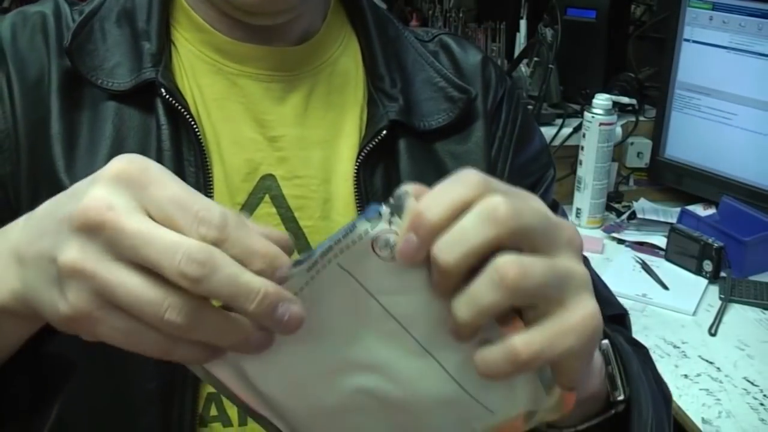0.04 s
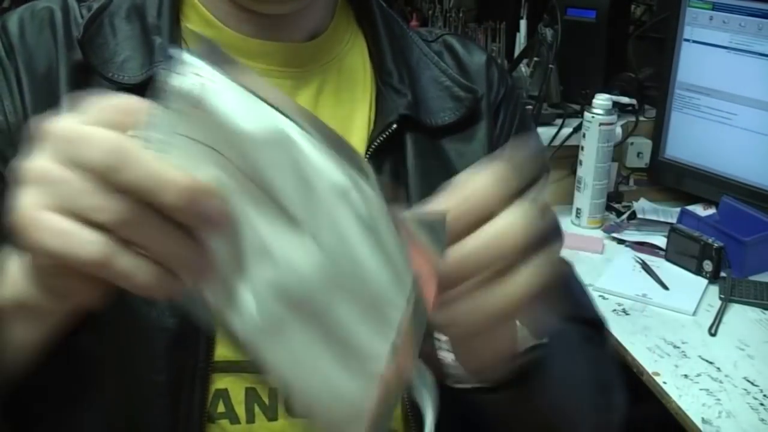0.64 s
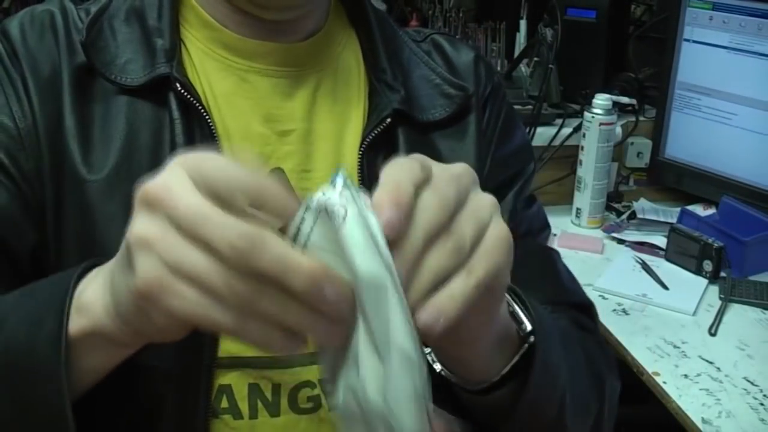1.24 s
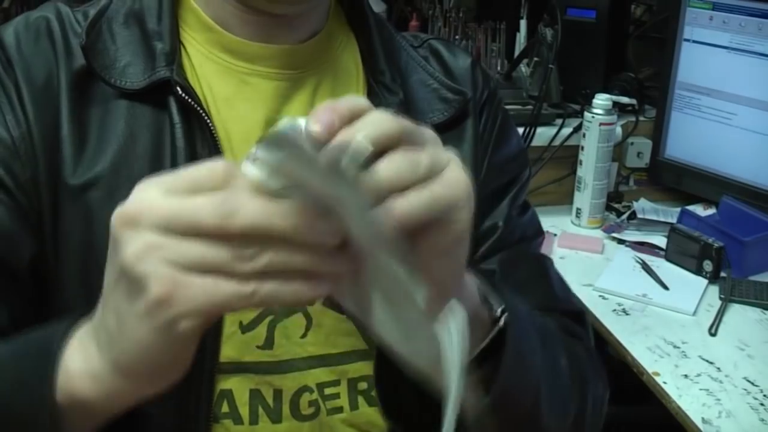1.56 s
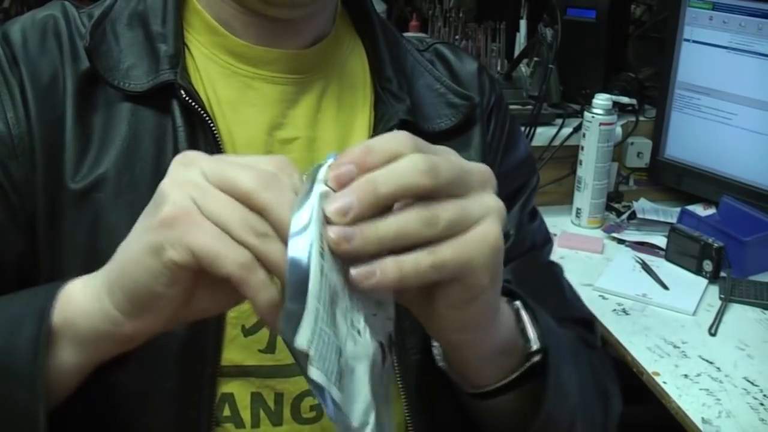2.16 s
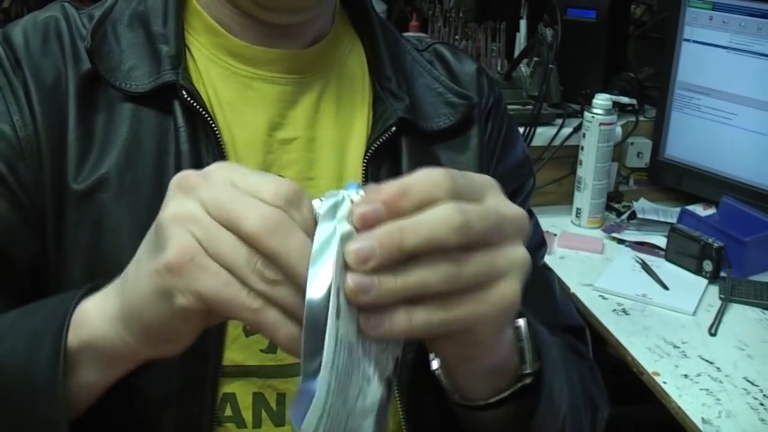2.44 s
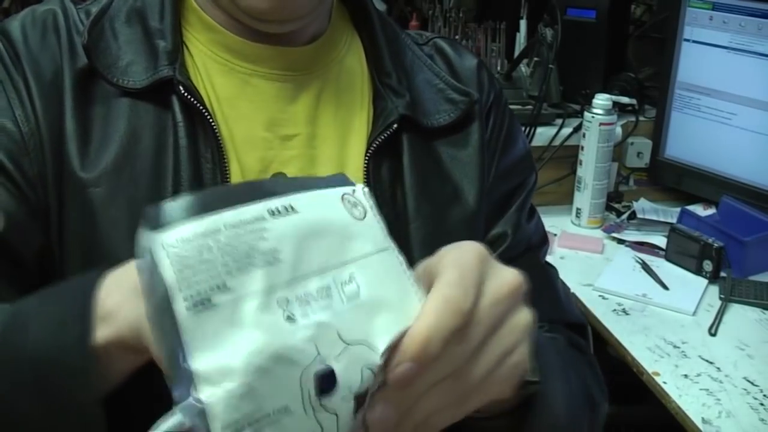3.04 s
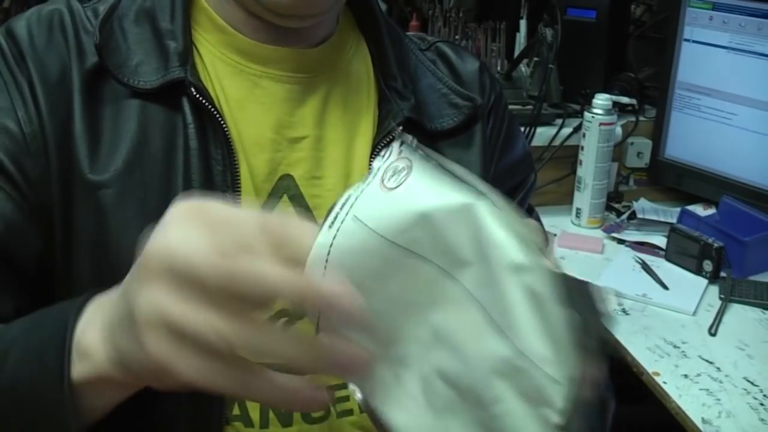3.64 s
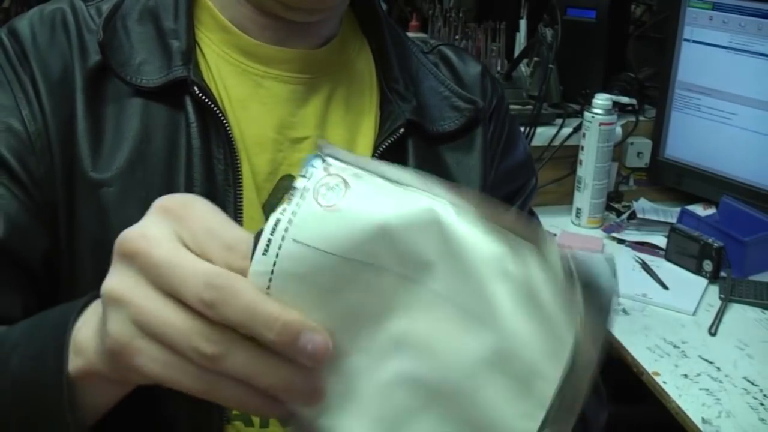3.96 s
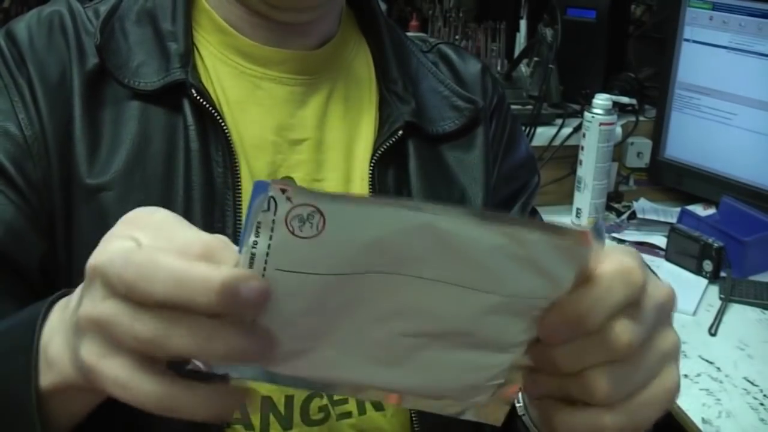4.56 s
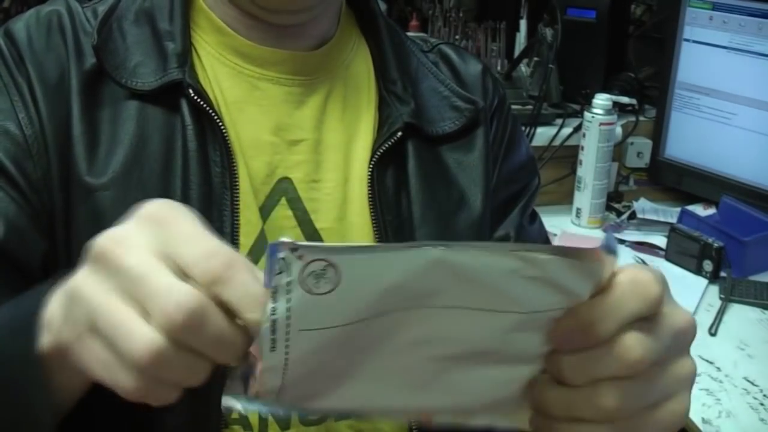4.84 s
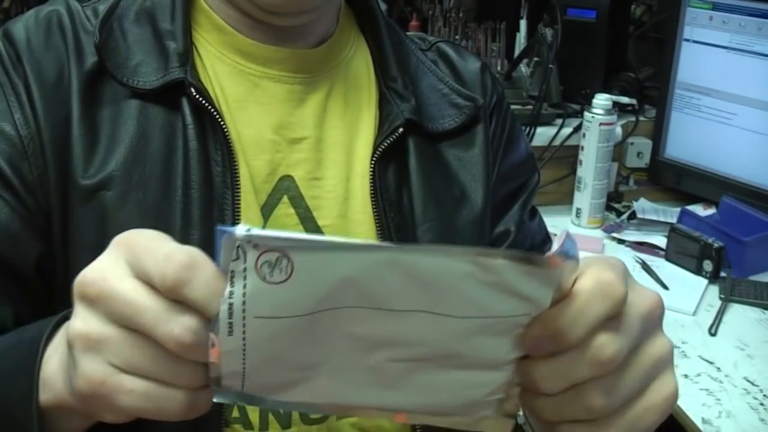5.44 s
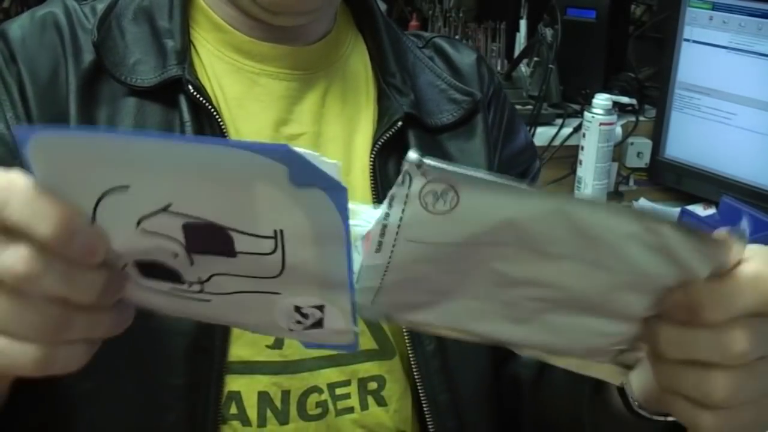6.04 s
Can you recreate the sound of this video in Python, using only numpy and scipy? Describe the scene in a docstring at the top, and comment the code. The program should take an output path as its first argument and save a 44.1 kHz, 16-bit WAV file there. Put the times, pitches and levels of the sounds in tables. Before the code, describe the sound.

A foil and plastic packet crinkles, snaps and rustles irregularly as it is turned and opened, over a soft equipment hum.

```python
"""Sharp crackles and soft rustling: two hands turn, bend and pull open a plastic-and-foil pouch.
Single creases snap, whole patches buckle in bursts of tiny clicks, and the pouch wall pops hollowly.
Fingers slide over the film and squeak faintly. A small metal piece, like a watch strap, tinkles
as the hands jerk. It all happens close by in a small room, where equipment hums softly."""
import sys
import numpy as np
from scipy import signal
from scipy.fft import rfft, irfft
from scipy.io import wavfile
from scipy.ndimage import uniform_filter1d

SR = 44100
rng = np.random.default_rng(int(sys.argv[2]) if len(sys.argv) > 2 else 0)


def digitize_waveform(pressure):
    """Quantize a signal to 16-bit integers and store it at the path in sys.argv[1].

    Rows of a 2-D input are taken as channels; values are limited to [-1, 1].
    """
    field = np.atleast_2d(pressure).T
    bounded = np.clip(field, -1, 1)
    quanta = np.round(bounded * 32767).astype(np.int16)
    wavfile.write(sys.argv[1], SR, quanta)


N = 277563
CLICK_SAMPLES = 2048
CLICK_HZ = np.fft.rfftfreq(CLICK_SAMPLES, 1 / SR)

# Levels in the tables are relative: the functions turn them up or down.
# one crease flips: start_s, level_db, pitch_hz, treble_fall_db_per_octave
CREASE_SNAPS = [(0.018,-30.5,1870,3.5), (0.0335,-31,2200,4), (0.4268,-29.5,1300,5.5), (.671,-27.5,1620,4),
                (0.7291,-29.5,7000,5), (0.808,-29.5,1400,10.5), (0.818,-27,2540,16), (0.846,-25,4500,8.5),
                (0.898,-28,1790,1), (1.354,-18,3170,9.5), (1.4019,-28,2350,8), (1.5024,-18.5,2410,29),
                (1.5563,-19.5,2730,12), (1.5857,-21,2170,11.5), (1.6059,-24.5,2060,15.5),
                (1.8183,-22,3040,15.5), (1.839,-23,3200,-24), (2.1693,-28,1840,31), (2.4006,-30.5,1260,20),
                (2.583,-24,3250,14), (2.653,-34.5,1590,11), (2.7656,-29,1300,5.5), (2.885,-35.5,1390,7),
                (3.002,-36.5,2580,14), (3.0676,-28.5,2130,8), (3.094,-20,2720,12), (3.174,-21.5,2830,15),
                (3.224,-14,2630,14.5), (3.2737,-17.5,2450,17.5), (3.438,-23,2650,19),
                (3.4783,-17.5,2160,10), (3.823,-36,1200,7.5), (3.8727,-29,2040,-2.5), (3.9955,-28,3600,5),
                (4.079,-34,2450,21), (4.2351,-21.5,1250,2), (4.24,-20.5,1040,5), (4.359,-33,3000,3),
                (4.3738,-25,1770,6), (4.394,-30,2040,10), (4.489,-31.5,1840,11), (4.6572,-34.5,1830,4),
                (4.6735,-30,5000,-1), (4.7307,-36,5000,21), (4.853,-22.5,2370,3.5), (4.977,-24,2600,25),
                (4.999,-28,1900,3), (5.0262,-29.5,4060,10), (5.415,-30,1430,6.5), (5.6909,-27.5,1520,5.5),
                (5.794,-38,3000,16), (5.8781,-20.5,4350,15), (5.9615,-25,2390,29), (6.059,-42.5,9000,-3)]
# a patch buckles: start_s, level_db, length_s, pitch_hz, treble_fall_db_per_octave
BUCKLES = [(0.031,-38.5,0.012,1900,4), (0.439,-38,0.034,1870,5), (0.556,-37.5,0.0049,1910,5),
           (0.812,-34.5,0.014,2260,9.5), (0.9232,-29.5,0.0091,2930,10.5), (0.94,-42.5,0.053,110,5.5),
           (1.043,-33.5,0.0096,2920,8), (1.2,-38,0.018,2000,3.5), (1.216,-28,0.0074,2340,11.5),
           (1.285,-43.5,0.038,1690,14), (1.339,-34,0.02,2100,7), (1.504,-27,0.0053,980,7),
           (1.833,-29,0.011,5030,9), (1.924,-40.5,0.013,2600,10), (2.169,-24.5,0.0048,1830,12.5),
           (2.182,-36,0.047,1750,11.5), (2.343,-43,0.045,1390,22.5), (2.58,-33.5,0.0076,3500,7),
           (2.627,-43.5,0.038,1350,9), (2.688,-36.5,0.0073,940,8.5), (3.208,-31.5,0.012,1730,6.5),
           (3.23,-31,0.032,2180,9), (3.477,-30,0.028,1240,9), (3.504,-36,0.051,1030,5),
           (3.605,-39.5,0.0074,530,16), (3.696,-36,0.037,2850,8), (3.735,-33.5,0.031,3400,11.5),
           (3.756,-36.5,0.013,710,16.5), (3.993,-32.5,0.0088,810,10.5), (4.233,-29.5,0.015,1150,2.5),
           (4.363,-41,0.043,2240,5.5), (4.44,-39,0.028,490,4), (4.528,-38.5,0.018,970,7.5),
           (4.764,-38.5,0.051,1680,3), (4.976,-33.5,0.042,2700,-2), (5.531,-46,0.036,744,10),
           (5.87,-34.5,0.016,2500,5.5), (5.891,-26.5,0.013,2600,6), (5.909,-32,0.043,1810,4.5),
           (5.949,-33.5,0.024,2120,11)]
# a finger slides: start_s, length_s, level_db, brightness_db (crisp part over dull part)
FINGER_STROKES = [(0.171,0.18,-45.5,2.5), (0.37,0.15,-47.5,0), (0.66,0.14,-53,-2), (0.826,0.31,-45.5,7.5),
                  (1.239,0.091,-39.5,-8), (1.308,0.12,-45,5), (1.463,0.1,-42,11), (1.852,0.11,-48,0),
                  (2.449,0.019,-45,-38), (2.594,0.22,-48.5,-5.5), (2.856,0.045,-46.5,-2.5),
                  (2.94,0.098,-41.5,2), (3.181,0.041,-40.5,2), (4.007,0.12,-48.5,2), (4.146,0.15,-43.5,6.5),
                  (4.405,0.12,-44,4), (4.55,0.03,-38,10), (4.661,0.041,-51,24), (4.727,0.11,-46.5,13),
                  (4.907,0.16,-49,0), (5.061,0.048,-38.5,11.5), (5.098,0.15,-49,-4), (5.518,0.3,-58,23)]
# tone of the sliding film: frequency_hz, level_db
FILM_TONE = [(100, 3.5), (200, 0.5), (450, -0.5), (1000, 5), (2200, 4.5), (3500, -4), (7000, -10.5),
             (14000, -17)]
# the whole pouch flexes: start_s, level_db
WALL_POPS = [(1.202,-35), (1.835,-35), (2.17,-43.5), (3.995,-30), (4.236,-43.5), (5.945,-37)]
# its hollow ring: pitch_hz, level_db, ring_s (time to fade by 60 dB)
POUCH_RING = [(164,1.5,0.06), (240.6,1.5,0.098), (405,4,0.046), (620,-4.5,0.15), (826,5,0.042)]
# a fingertip sticks and slips: start_s, length_s, level_db
FINGER_SQUEAKS = [(3.343,0.056,-40.5), (4.117,0.041,-41)]
# the metal piece is shaken: start_s, level_db
METAL_SHAKES = [(1.203,-39), (1.834,-37), (2.343,-50), (2.694,-49), (3.545,-40), (4.445,-41), (5.538,-42.5),
                (5.574,-47), (5.626,-47), (5.984,-43)]
# its ring: pitch_hz, level_db, ring_s
METAL_RING = [(6806, 5, 0.04), (11100, 7, 0.007), (13200, 8, 0.01)]
# tone of the fan noise: frequency_hz, level_db
FAN_TONE = [(25, -15.5), (90, -3), (190, 7.5), (320, -3), (550, 1.5), (1400, -2), (3200, -7),
            (10000, -18.5), (15000, -49)]
# equipment hum: pitch_hz, level_db
HUM_TONES = [(67, -74), (398, -67)]
# how long the room echoes: frequency_hz, ring_s
ROOM_FADE = [(150, 0.27), (500, 0.15), (1500, 0.21), (4000, 0.19), (12000, 0.24)]
# low notes that ring between the walls: pitch_hz, level_db, ring_s
ROOM_NOTES = [(167.7, -7, 0.22), (241, -3, 0.37)]
# tone of the microphones: frequency_hz, level_db
MIC_TONE = [(20, -19), (60, -25), (150, -1), (320, 7), (900, 3.5), (9000, 2), (13000, -4.5), (16000, -36)]
# stereo balance: frequency_hz, left_minus_right_db
MIC_BALANCE = [(80, -4.5), (900, -2.5), (2500, 3.5), (7000, -1.6)]


def crease_snaps(trim_db=0, shiver_s=0.0027, shiver_gain=0.86, build_s=0.00028):
    """Each crease gives a sharp click, then the sheet around it shivers for a few milliseconds."""
    out, t = np.zeros((2, N)), np.arange(CLICK_SAMPLES) / SR
    for start, db, hz, fall_db in CREASE_SNAPS:
        shiver = rng.standard_normal(len(t)) * np.exp(-t / shiver_s) * (1 - np.exp(-t / build_s))
        tone = patch_tone(hz, rise_db=6.5, fall_db=fall_db) + fold_tone(depth_db=2.5)
        click = make_click(tone, travel_s=0.000597)
        snap = click + shiver_gain * signal.fftconvolve(click, unit_energy(shiver))[:len(t)]
        add(out, start, pan(gain(db + trim_db) * np.sqrt(0.0011 * SR) * unit_energy(snap)))
    return out


def buckling_patches(trim_db=0.5, attack_share=0.025, release_s=0.013, lurch_db=3, puff_db=-10, folds=4):
    """A patch gives way in lurches, setting off clicks in nearby folds and pushing a puff of air."""
    out, t = np.zeros((2, N)), np.arange(SR // 6) / SR
    for start, db, length, hz, fall_db in BUCKLES:
        rise_db = 8.5 * (hz / 1000) ** -1.18  # low patches lose their bass more steeply
        force = 1 - np.exp(-t / (attack_share * length))
        force *= np.exp(-0.4 * t / length - np.maximum(t - length, 0) / release_s)
        # the film catches and lets go every few milliseconds
        force *= gain(lurch_db * unit_rms(uniform_filter1d(rng.standard_normal(len(t)), size=160)))
        bursts = []
        for _ in range(folds):
            ticks = force * random_ticks(len(t), per_s=750, spread_db=2.5, rub=0.54)
            travel_s = 0.000832 * rng.random()
            tone = patch_tone(hz, rise_db, fall_db) + fold_tone(depth_db=5)
            bursts.append(signal.fftconvolve(ticks, make_click(tone, travel_s)))
        level = gain(db + trim_db) * np.sqrt(length * SR)
        for burst in bursts:
            add(out, start, pan(level / np.sqrt(folds) * unit_energy(burst)))
        puff = keep_band(force * rng.standard_normal(len(t)), "low", edge_hz=80, order=2)
        add(out, start, pan(level * gain(puff_db) * unit_energy(puff)))
    return out


def sliding_film(trim_db=-2, grip_db=3, life_s=0.12, overlap=6, split_hz=3500):
    """Small folds come and go in a fine crackle; taut film sounds brighter than slack film."""
    crackle, life = np.zeros((2, N)), round(life_s * SR)
    for start in np.arange(0, N, life / overlap):
        grip = gain(grip_db * rng.standard_normal()) * np.hanning(life)
        slips = grip * random_ticks(life, per_s=170, spread_db=4, rub=0.82)
        click = make_click(curve(FILM_TONE, CLICK_HZ) + fold_tone(depth_db=4.5))
        add(crackle, start / SR, pan(signal.fftconvolve(slips, click)))
    dull = unit_rms(keep_band(crackle, "low", split_hz, order=3))
    crisp = unit_rms(keep_band(crackle, "high", split_hz, order=3))
    dull_gain, crisp_gain = finger_strokes()
    return gain(trim_db) * (dull_gain * dull + crisp_gain * crisp)


def finger_strokes(swell_share=0.078, release_s=0.014):
    """Volume of the dull and the crisp rustle over time: each stroke swells, holds and dies away."""
    def split_power(db, bright_db):
        ratio = gain(bright_db) ** 2
        return gain(db) ** 2 * np.array([[1], [ratio]]) / (1 + ratio)

    power = split_power(db=-64.5, bright_db=-27) * np.ones(N)  # the pouch is just being held
    t = np.arange(SR // 2) / SR
    for start, length, db, bright_db in FINGER_STROKES:
        swell = np.minimum(t / (swell_share * length), 1)
        fade = np.exp(-2 * np.maximum(t - length, 0) / release_s)
        add(power, start, split_power(db, bright_db) * swell * fade)
    return np.sqrt(power)


def wall_pops(trim_db=-3, give_s=0.013, flutter=0.99):
    """The pouch wall gives way, flutters for an instant and rings, a little differently in each grip."""
    out, t = np.zeros((2, N)), np.arange(SR // 5) / SR
    for start, db in WALL_POPS:
        push = flutter * rng.standard_normal(len(t)) * np.exp(-t / give_s) / np.sqrt(give_s * SR / 2)
        push[0] = 1
        ring = ringing(POUCH_RING, t, detune=0.045)
        pop = unit_energy(signal.fftconvolve(push, ring)) * np.linalg.norm(ring)
        add(out, start, pan(gain(db + trim_db) * pop))
    return out


def finger_squeaks(trim_db=-2):
    """Quick slips of a fingertip swell and fade, making the taut film ring."""
    out = np.zeros((2, N))
    for start, length, db in FINGER_SQUEAKS:
        t = np.arange(0, length, 1 / SR)
        slips = np.sin(np.pi * t / length) * random_ticks(len(t), per_s=900, spread_db=2, rub=0.93)
        tone = patch_tone(hz=2550, rise_db=9, fall_db=16.5) + fold_tone(depth_db=4)
        squeak = signal.fftconvolve(slips, make_click(tone))
        add(out, start, pan(gain(db + trim_db) * np.sqrt(len(t)) * unit_energy(squeak)))
    return out


def metal_tinkles(rattle_s=0.02, hits_per_s=150, links=5):
    """The metal piece is jerked and its links chatter, each at a slightly different pitch."""
    out, t = np.zeros((2, N)), np.arange(SR // 8) / SR
    for start, db in METAL_SHAKES:
        for link in range(links):
            hits = rng.standard_normal(len(t)) * chance(len(t), hits_per_s) * np.exp(-t / rattle_s)
            hits[0] = link == 0  # only the first link takes the opening knock
            ring = ringing(METAL_RING, t, detune=0.0193)
            add(out, start, pan(gain(db) * signal.fftconvolve(hits, ring) / np.sqrt(links)))
    return out


def fan_and_hum(fan_db=-51.5, width=0.38, waver_rad=0.18):
    """Equipment in the background: soft fan noise and two wavering tones."""
    t, hum = np.arange(N) / SR, np.zeros(N)
    tone = gain(curve(FAN_TONE, np.fft.rfftfreq(N, 1 / SR)))
    middle, side = irfft(rfft(rng.standard_normal((2, N))) * tone, N)
    for hz, db in HUM_TONES:
        drift = unit_rms(uniform_filter1d(uniform_filter1d(rng.standard_normal(N), 5000), 2000))
        hum += gain(db) * unit_rms(np.sin(2 * np.pi * hz * t + waver_rad * drift))
    return gain(fan_db) * unit_rms(stereo(middle, width * side)) + hum


def room_echo(sound, echo_db=-2.5, width=0.44, build_s=0.0022):
    """Sound bounces off desk, body and walls, and sets the room's low notes ringing."""
    t = np.arange(SR // 2) / SR
    bounces = rng.choice([-1, 1], (2, len(t))) * chance((2, len(t)), per_s=4000)
    middle, side = bounces * (1 - np.exp(-(t / build_s) ** 2))
    band_hz, age, bands = signal.stft(stereo(middle, width * side), SR, nperseg=256)
    fade = gain(-60 * age / curve(ROOM_FADE, band_hz)[:, None])
    tail = signal.istft(bands * fade, SR, nperseg=256)[1][:, :len(t)]
    echo = gain(echo_db) * tail / np.linalg.norm(tail[0])
    for hz, db, ring_s in ROOM_NOTES:
        scale = 2 * np.log(1000) / (ring_s * SR)  # so ringing longer does not boost the note
        echo += scale * gain(db - 60 * t / ring_s) * np.cos(2 * np.pi * hz * t)
    return sound + signal.fftconvolve(sound, echo, axes=1)[:, :N]


def moving_echoes(sound, cycles_per_s=0.908, patterns=3):
    """The pouch keeps moving, so its sound fades from one pattern of echoes to the next."""
    angle = cycles_per_s * np.pi * np.arange(N) / SR
    shares = [np.cos(angle + np.pi * k / patterns) ** 2 * 2 / patterns for k in range(patterns)]
    return sum(room_echo(sound * share) for share in shares)


def microphones(sound, bend_db=-16, delay_s=0.0002):
    """Sound bends round the casing, reaches two microphones unevenly and takes on their tone."""
    bent = gain(bend_db) * np.roll(sound.mean(0), round(delay_s * SR))
    balance_db = curve(MIC_BALANCE, np.fft.rfftfreq(N, 1 / SR))
    pair = irfft(rfft(sound + stereo(0, bent)) * gain(stereo(0, balance_db / 2)), N)
    tone = curve(MIC_TONE, CLICK_HZ)
    level = np.sqrt(np.mean(gain(tone) ** 2))
    return level * signal.oaconvolve(pair, make_click(tone)[None], axes=1)[:, :N]


def make_click(tone_db, travel_s=0):
    """A click with this tone. Treble crosses the film fastest; travel_s is the time 1 kHz takes."""
    log_gain = np.log(gain(np.maximum(tone_db - tone_db.max(), -90)))
    mirrored = np.concatenate([log_gain, log_gain[-2:0:-1]])
    spectrum = np.exp(np.conj(signal.hilbert(mirrored)))[:len(CLICK_HZ)]  # packs the energy at the start
    lag_rad = 4 * np.pi * travel_s * np.sqrt(1000 * CLICK_HZ)
    return unit_energy(irfft(spectrum * np.exp(-1j * lag_rad)))


def patch_tone(hz, rise_db, fall_db):
    """A piece of film is loudest at its own pitch; the slopes either side are in dB per octave."""
    octaves = np.log2((CLICK_HZ + 20) / hz)
    return rise_db * np.minimum(octaves, 0) - fall_db * np.maximum(octaves, 0)


def fold_tone(depth_db, points=36):
    """Each fold favours some pitches by chance: random peaks and dips, in dB."""
    bumps = np.c_[np.geomspace(120, 16000, points), rng.standard_normal(points)]
    return depth_db * curve(bumps, CLICK_HZ)


def random_ticks(size, per_s, spread_db, rub):
    """Ticks of uneven strength over a smooth rubbing hiss."""
    strength = gain(spread_db * np.minimum(rng.exponential(1, size), 3.5))
    ticks = strength * rng.choice([-1, 1], size) * chance(size, per_s)
    return unit_rms(unit_rms(ticks) + rub * rng.standard_normal(size))


def ringing(notes, t, detune):
    """The fading notes of a struck object, each slightly out of tune by chance."""
    return sum(gain(db - 60 * t / ring_s) * np.sin(2 * np.pi * hz * rng.normal(1, detune) * t)
               for hz, db, ring_s in notes)


def chance(size, per_s):
    """Picks random samples, about per_s each second."""
    return rng.random(size) < per_s / SR


def pan(sound, spread=0.13):
    """Puts a sound somewhere between the two hands."""
    return stereo(sound, spread * rng.standard_normal() * sound)


def stereo(middle, side):
    """Adds side on the left and takes it away on the right."""
    return np.array([middle + side, middle - side])


def add(mix, start_s, sound):
    """Mixes a sound in at start_s."""
    part = mix[..., round(start_s * SR):][..., :sound.shape[-1]]
    part += sound[..., :part.shape[-1]]


def keep_band(sound, kind, edge_hz, order):
    """Keeps the "low" or the "high" side of edge_hz."""
    return signal.sosfilt(signal.butter(order, edge_hz, kind, fs=SR, output="sos"), sound)


def curve(table, hz):
    """Reads between a table's rows, on a scale of octaves."""
    row_hz, values = np.transpose(table)
    return np.interp(np.log(hz + 1), np.log(row_hz + 1), values)


def gain(db):
    """Turns decibels into a multiplier."""
    return 10 ** (np.asarray(db) / 20)


def unit_rms(sound):
    """Scales the average power to 1."""
    return sound / np.sqrt(np.mean(sound ** 2) + 1e-20)


def unit_energy(sound):
    """Scales the total energy to 1."""
    return sound / np.linalg.norm(sound)


def scene():
    """The pouch and the metal piece in the room, over the fan and hum."""
    pouch = crease_snaps() + buckling_patches() + wall_pops() + finger_squeaks() + sliding_film()
    return microphones(moving_echoes(pouch + metal_tinkles())) + fan_and_hum()


def record(dry):
    """Cuts the highest treble, above 16300 Hz."""
    treble_cut = signal.firwin(255, 16300, window=("kaiser", 9), fs=SR)
    return signal.oaconvolve(dry, treble_cut[None], "same")


dry = scene()
out = record(dry)
digitize_waveform(out)
```